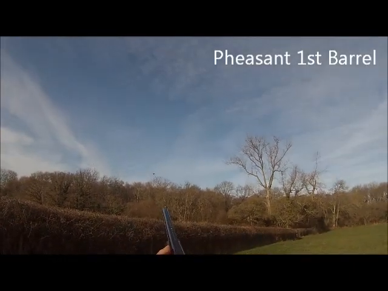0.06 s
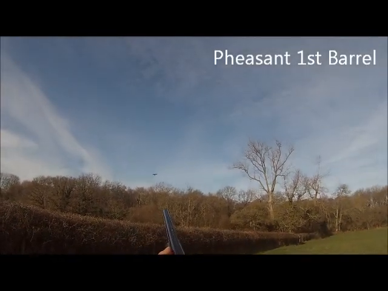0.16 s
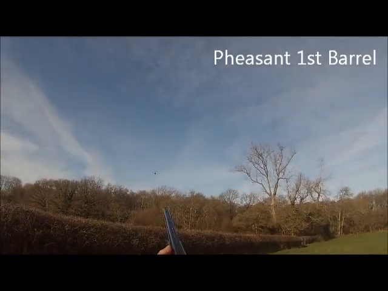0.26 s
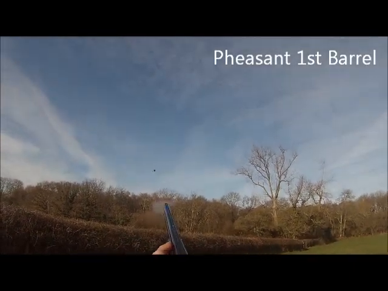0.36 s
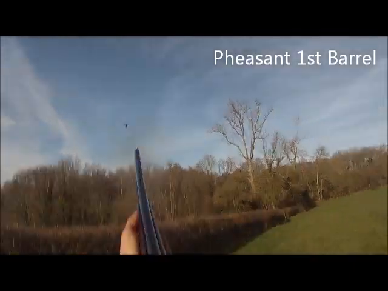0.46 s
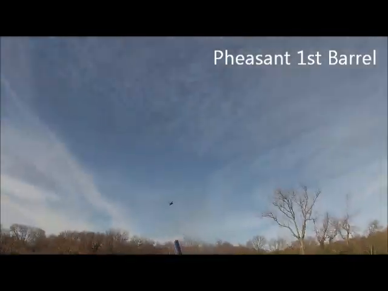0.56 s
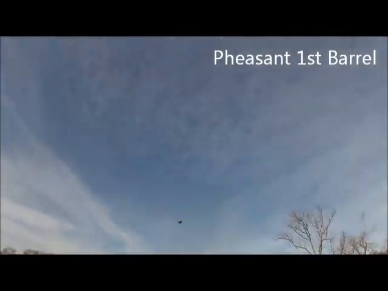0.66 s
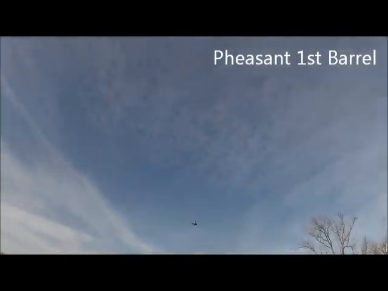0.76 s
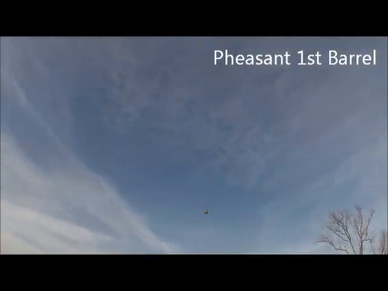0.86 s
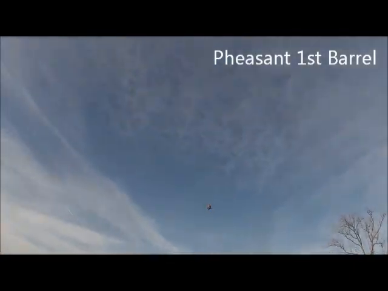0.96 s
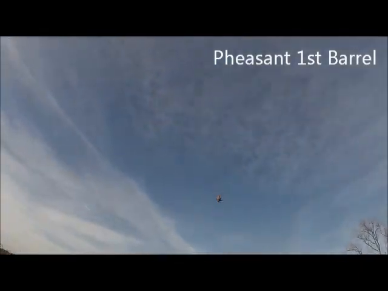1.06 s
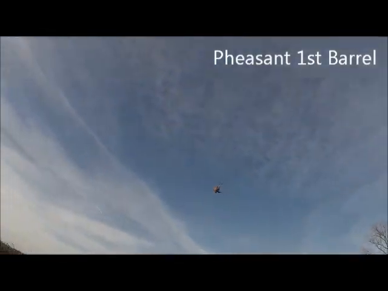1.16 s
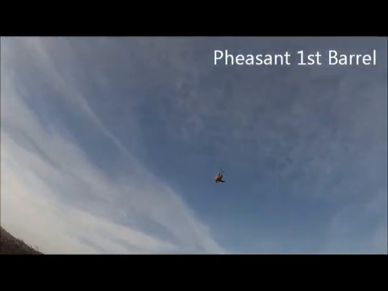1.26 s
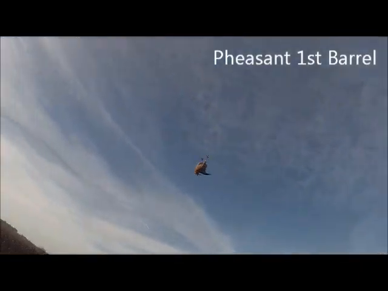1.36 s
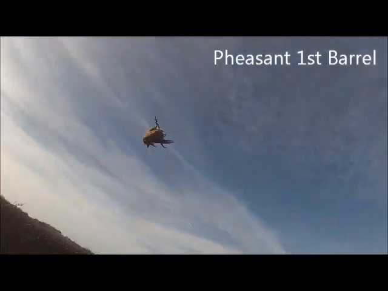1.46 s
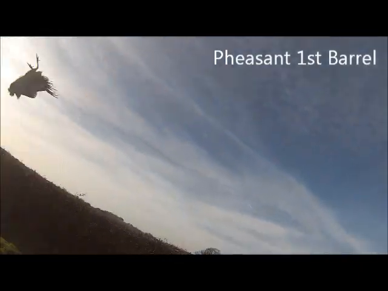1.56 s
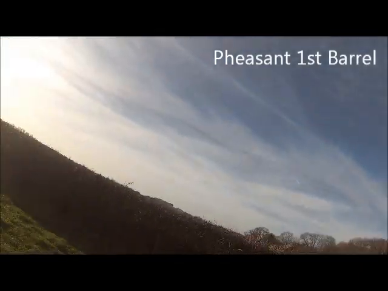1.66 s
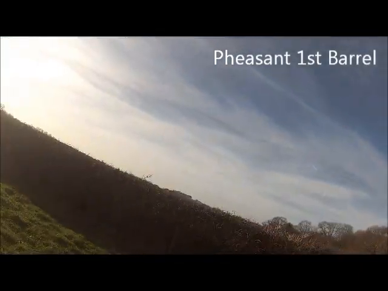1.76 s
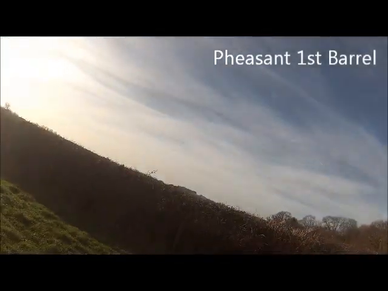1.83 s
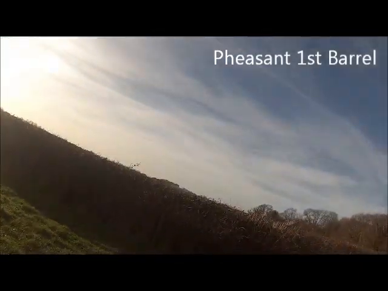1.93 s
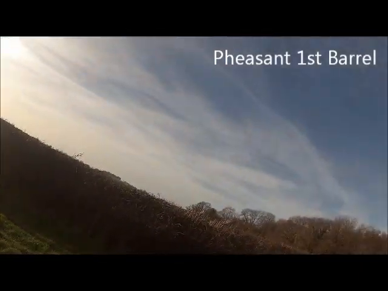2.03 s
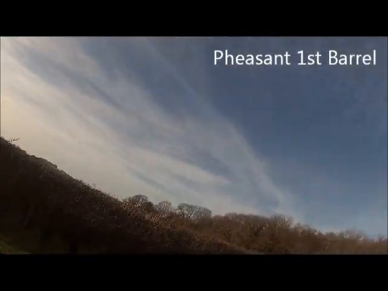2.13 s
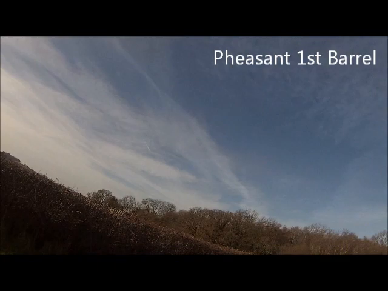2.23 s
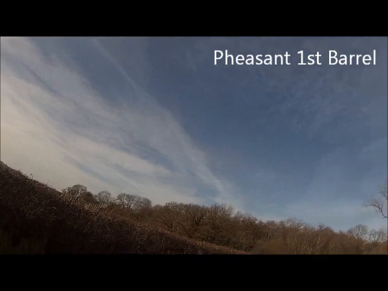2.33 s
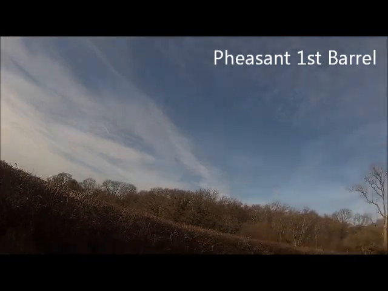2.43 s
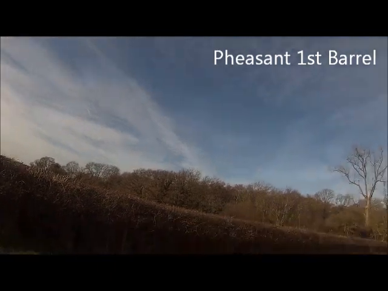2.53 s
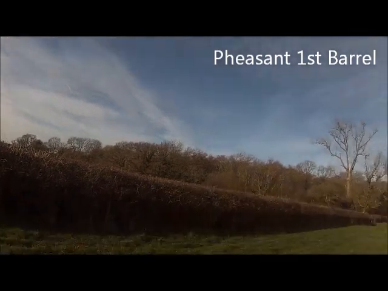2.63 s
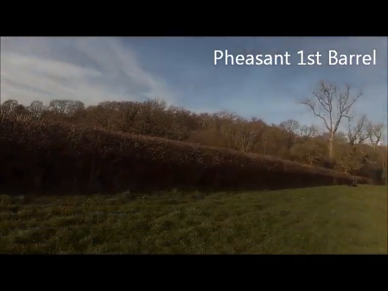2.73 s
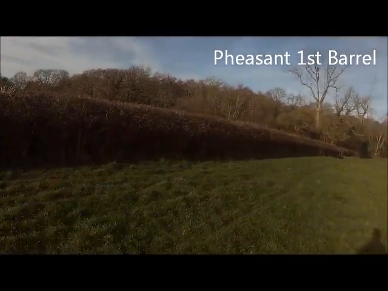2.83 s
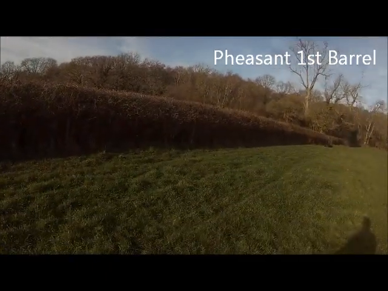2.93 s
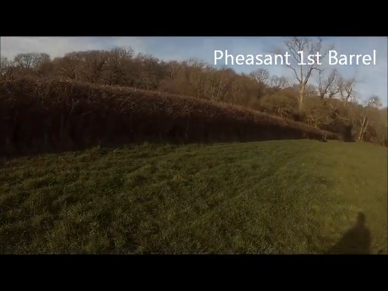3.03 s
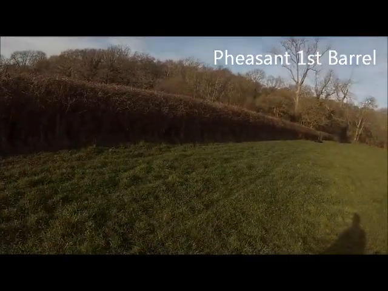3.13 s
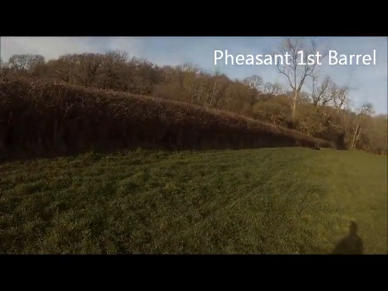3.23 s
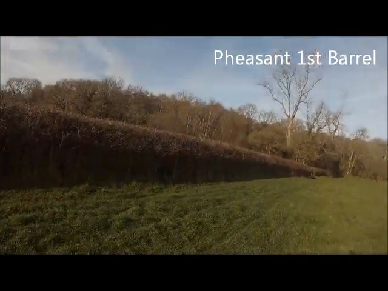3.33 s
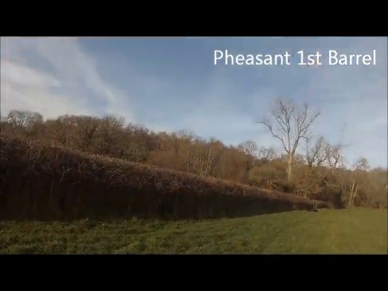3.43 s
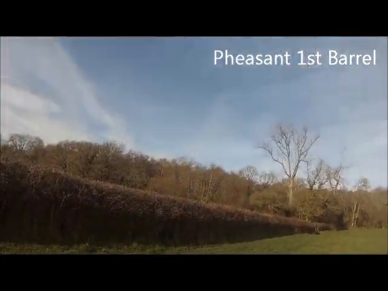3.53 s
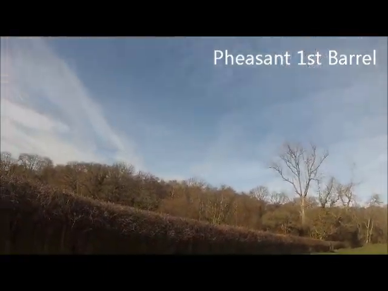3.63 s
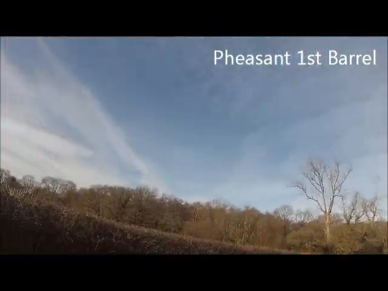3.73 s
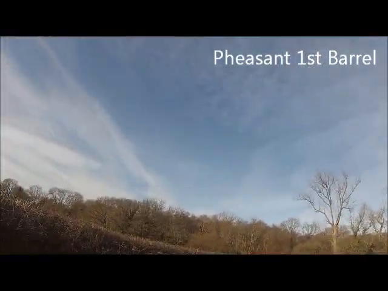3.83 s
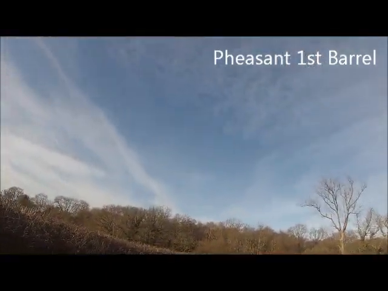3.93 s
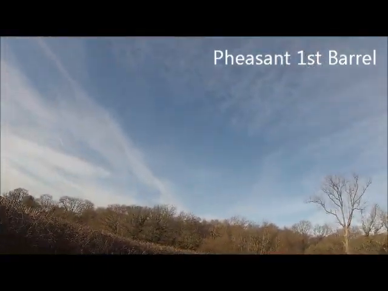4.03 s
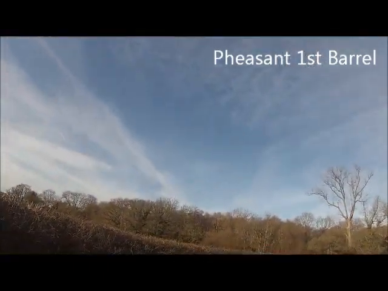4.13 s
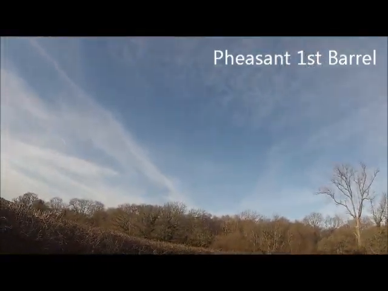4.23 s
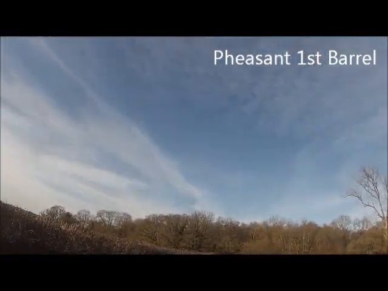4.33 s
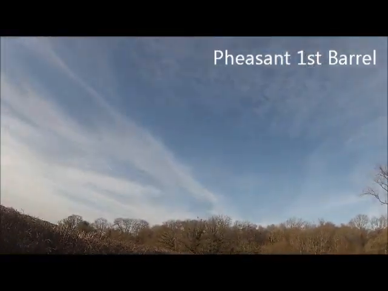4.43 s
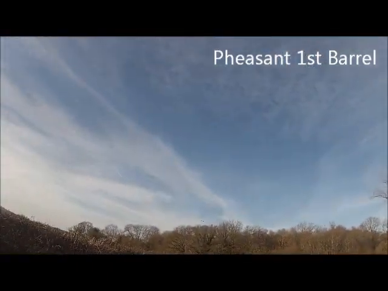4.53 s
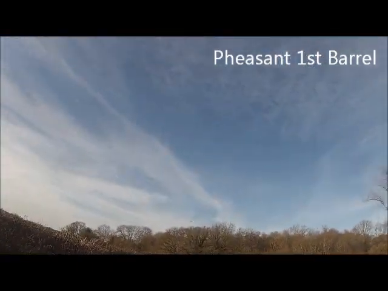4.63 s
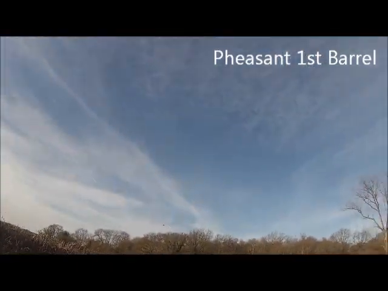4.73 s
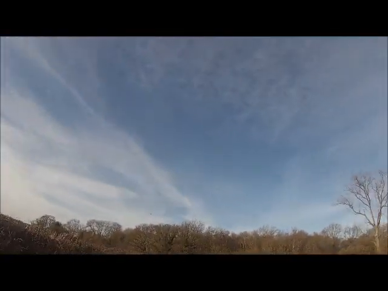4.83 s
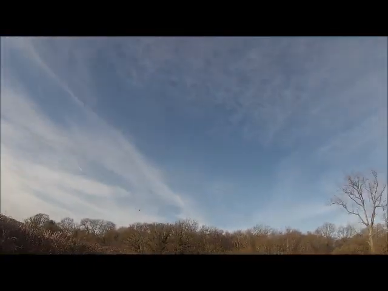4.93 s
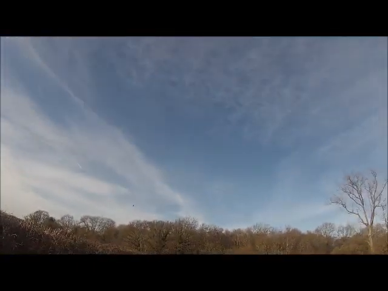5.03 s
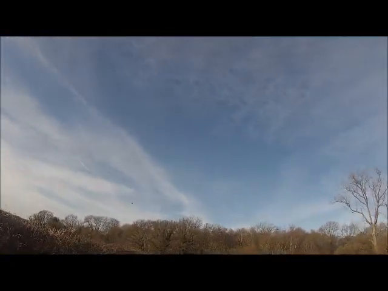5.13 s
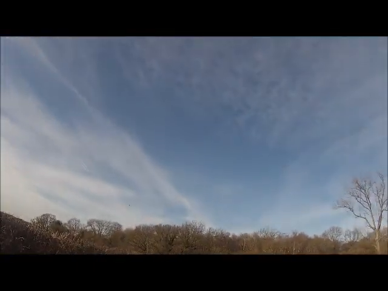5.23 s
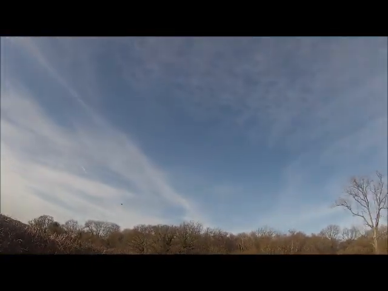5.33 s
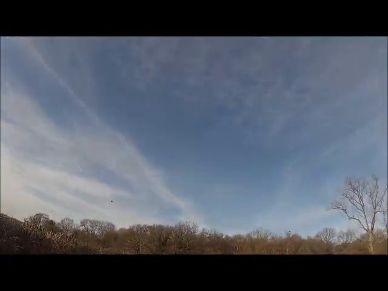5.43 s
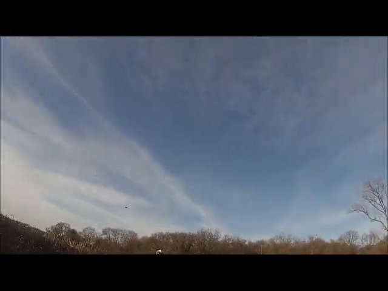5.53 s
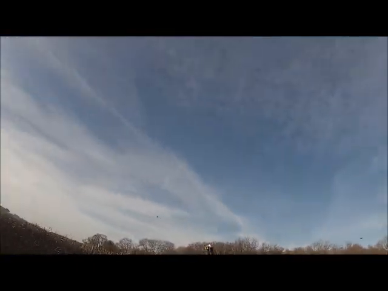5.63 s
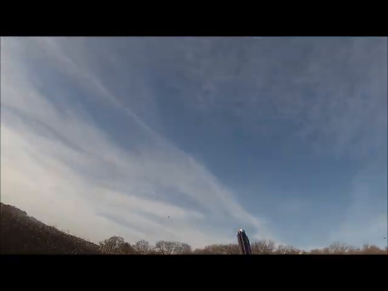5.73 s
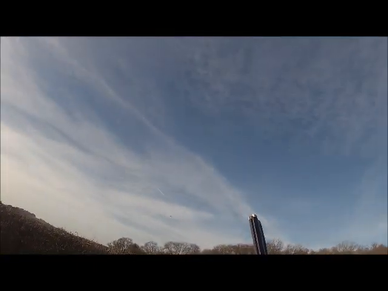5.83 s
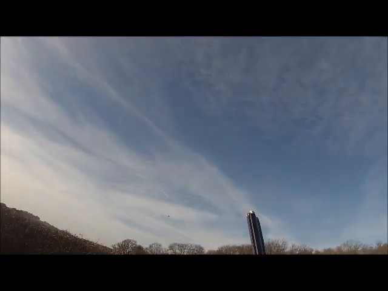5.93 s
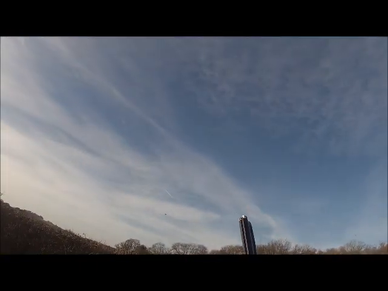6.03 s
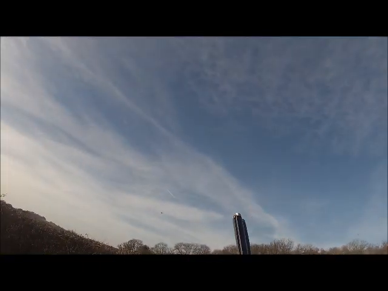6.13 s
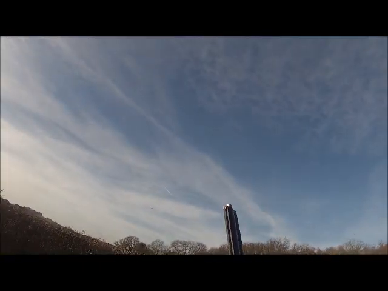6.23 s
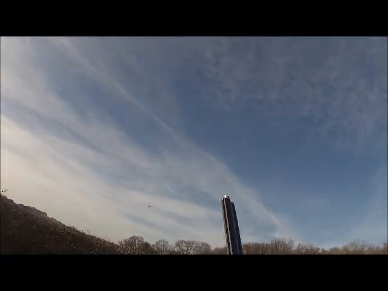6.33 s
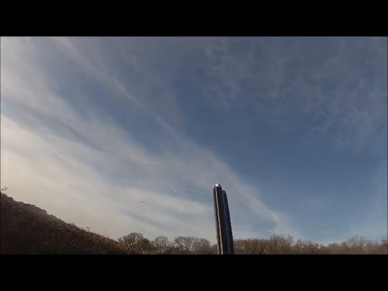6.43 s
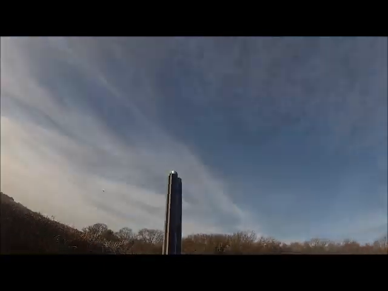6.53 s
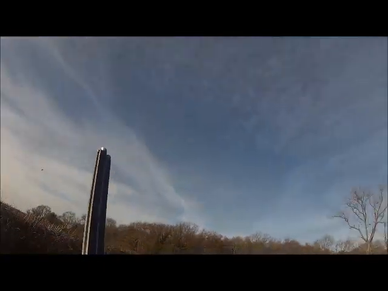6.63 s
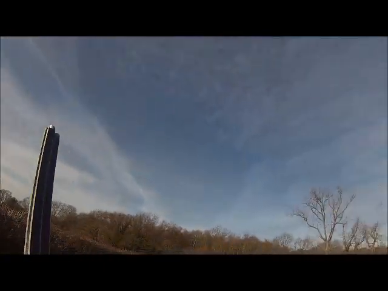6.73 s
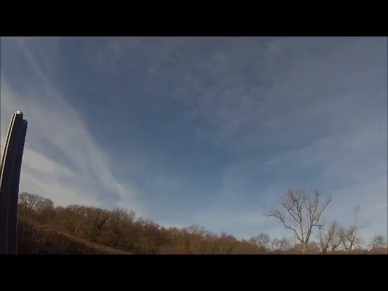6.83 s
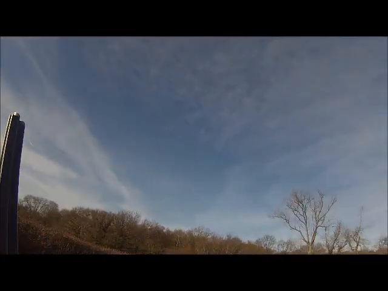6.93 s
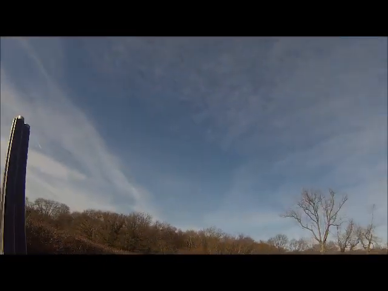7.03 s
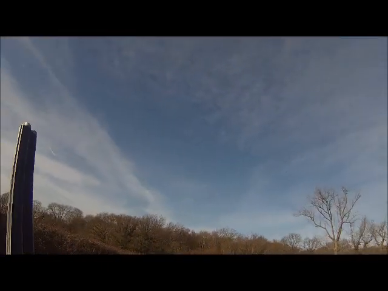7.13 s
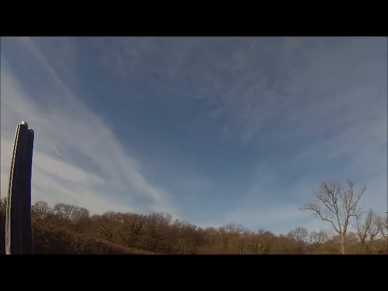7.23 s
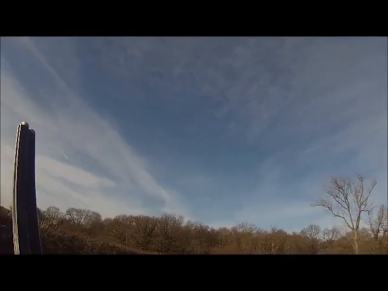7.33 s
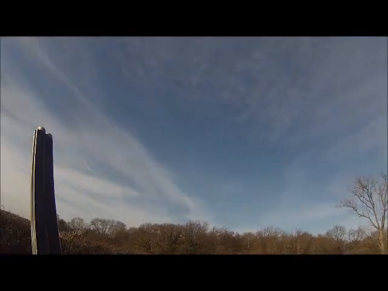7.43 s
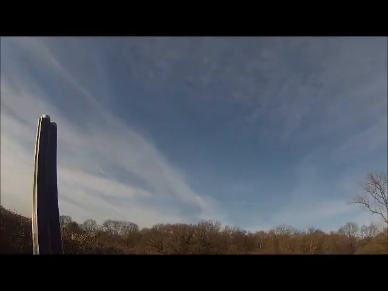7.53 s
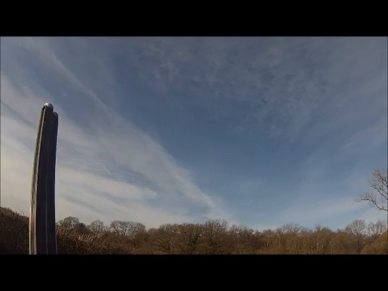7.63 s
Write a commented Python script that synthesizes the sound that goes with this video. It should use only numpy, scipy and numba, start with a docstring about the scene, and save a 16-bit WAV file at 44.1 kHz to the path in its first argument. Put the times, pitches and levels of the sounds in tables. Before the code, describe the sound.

Quiet field hiss with faint regular electrical ticking, then a huge close shotgun blast, boxy and clipped, followed by a short slap and fading roll from hedge and trees. A hard metallic clack comes about a second later, then sparse light steel clicks. The gun closes with a ringing double clack and quick rattle. Two distant, muffled pops follow almost a second apart, with grainy echoes, before hiss remains. Mono, cased camera microphone.

```python
"""A shotgun goes off beside a small camera in a sealed case, out in a field; two more shots come from a neighbour.
Blasts are noise shaped by pressure envelopes and coloured by the case; hedge and woods throw them back.
The gun's action clacks as scraped noise ringing steel modes; the mount thuds as decaying low sines.
Wind rumbles on the case as filtered noise over a steady hiss, and the camera's radio ticks into its microphone
line by filtered supply dips. Its gain control ducks loud passages, then the sound is softly clipped."""
import sys
import numpy as np
from scipy import signal
from scipy.fft import rfft, irfft
from scipy.io import wavfile
from scipy.ndimage import uniform_filter1d
from numba import njit

SR = 44100
rng = np.random.default_rng(int(sys.argv[2]) if len(sys.argv) > 2 else 0)


def generate_wav(signal):
    """Clip the signal to [-1, 1] and save it as 16-bit WAV at the path in sys.argv[1]."""
    frames = np.transpose(np.atleast_2d(signal))
    scaled = np.clip(frames, -1, 1) * 32767
    pcm = np.round(scaled).astype(np.int16)
    wavfile.write(sys.argv[1], SR, pcm)


N = 338232

# microphone and field hiss spectrum: f/Hz, relative level/dB
HISS_SPECTRUM = [(59, -31.5), (100, -0.5), (319, -6), (541, -8.5), (917, -11.5), (1160, -14), (1490, -11.5),
                 (3050, -17), (12600, -30), (15500, -36)]
HISS_DB = -61.5  # rms
# wind on the case: t/s, rumble level/dB
WIND_LEVELS = [(0, -46), (.2, -45), (.42, -47), (.5, -29), (.6, -23), (.7, -38.5), (.98, -49.5),
               (1.18, -41), (1.42, -50), (1.65, -50.5), (2.5, -52), (3.4, -57), (3.8, -53), (3.92, -41.5),
               (4.65, -48), (4.85, -52), (5.28, -50.5), (5.801, -55), (6.35, -53), (6.8, -58), (7., -53.5),
               (7.67, -61)]
FLUTTER_DB, GUST_DB, GUST_S = -17, 2.5, .08  # flutter is relative to the rumble
BEACON_FIRST_S, BEACON_PERIOD_S = .04885, .1024
BEACON_MS, BEACON_DB = 1.72, -40.5  # supply dip, before filtering

# cavities of the camera case, one table per range: f/Hz, width/Hz, level/dB
CASE_MID_MODES = [(1257, 330, -9.5), (1550, 380, -2), (1901, 310, 1.5), (2407, 350, -4.5), (2864, 350, -7),
                  (3226, 410, -9.5)]
CASE_TREBLE_MODES = [(3730, 340, -8), (4030, 320, -5.5), (4292, 410, -1), (4940, 800, -5)]
CASE_BASS_MODES = [(301, 230, -6), (546.3, 280, -1), (874, 410, -1), (1092, 250, 0.5)]
CASE_SIZZLE_MODES = [(7482, 1900, 2.5), (9363, 990, 0), (10360, 870, -4.5), (11900, 580, -9),
                     (12400, 710, -9), (14000, 1400, -8)]
CASE_HIGH_MODES = [(5800, 350, 0.5), (6348, 540, -2.5), (7040, 500, -8)]
# every list of five range levels follows this order
RANGES = CASE_MID_MODES, CASE_TREBLE_MODES, CASE_BASS_MODES, CASE_SIZZLE_MODES, CASE_HIGH_MODES
HIGH_DB, HIGH_LOSS = -3.5, 1.6  # air dulls the high range this many times as much as the treble

# muzzle blasts; treble, bass and sizzle are relative to the mid range:
# t/s, mid level/dB, blast length/ms, share of it that the upper ranges last, treble/dB, bass/dB, sizzle/dB,
# pressure push/dB, afterblast/dB relative to the blast, ground scatter/dB, scatter t60/s
BLASTS = [(0.469, 9.5, 3.93, 0.84, 2, -16, -16.5, 5, -24.5, -43, 0.27),
          (5.043, -20.5, 2.72, 0.77, -2.5, -14, -16.5, -29.5, -11.5, -27.5, 0.55),
          (5.878, -24, 3.14, 0.72, -2.5, -15, -16, -32.5, -8, -25.5, 0.48)]
# slaps from hedge and tree line: t of peak/s, mid level/dB, rise/ms, relative treble/dB, relative bass/dB
ECHO_SLAPS = [(0.526, -36, 25, 1.5, -8), (.619, -44, 24, -27, -6), (.729, -55.5, 9.7, -19, -12.5),
              (.764, -52.5, 10.3, -4.5, -10), (.92, -59, 8.3, -5, -3.5), (.945, -61.5, 11.3, -3, 4),
              (5.196, -55.5, 9.7, 1.5, -14), (5.216, -41.5, 8, -6, -1.5), (5.34, -55.5, 9.5, -9.5, -6),
              (6.036, -55, 4.8, -3, -5.5), (6.054, -48.5, 8.3, -7, -8), (6.565, -64, 6.6, -16.5, -11.5)]
# air takes the top off slaps and rolls, this many times their treble loss
ECHO_SIZZLE_DB, SIZZLE_LOSS = -13.5, 2
SLAP_T60_PER_RISE = 11.9  # a slap dies away over this many rise times
# rolls from the far woods, one per shot: t of arrival/s, mid level/dB, hold/s, fade/(dB/s), relative bass/dB
WOOD_ROLLS = [(0.841, -54.5, 0.24, 19.5, -3), (5.238, -53.5, 0.13, 30, -3), (6.074, -59, 0.17, 31.5, -8)]
ROLL_RISE_S, ROLL_TREBLE_DB, ROLL_DULL_DB_PER_S, ROLL_DULLEST_DB = 0.062, -3, 28, -13

# dull knocks through the mount: t/s, level/dB, f/Hz, t60/s
MOUNT_THUDS = [(.475, -36, 40, 0.16), (.522, -37, 240, 0.11), (.558, -24.5, 192, 0.067),
               (0.578, -8, 31, 0.24), (.58, -26, 62, 0.15), (.655, -44.5, 221, 0.22),
               (1.423, -40, 44.7, 0.13), (4.263, -37.5, 98, 0.155)]
# steel parts of the gun knocking: t/s, peak level/dB, contact/ms, ring over scrape/dB, best rung f/Hz
STEEL_KNOCKS = [(.59, -26, .92, -8, 7300), (1.172, -53, 1.1, -12, 7300), (1.289, -53, 1.5, -10, 7300),
                (1.3449, -43, 3, -8, 10500), (1.357, -54, 2.1, -3, 5800), (1.3915, -43, 2.3, -6, 5800),
                (1.4152, -19, 3, -15, 7300), (1.4176, -22, 6.4, 9, 2900), (1.424, -40.5, 22, -22, 5800),
                (1.545, -47, 3, -5, 3200), (1.862, -48.5, 6, -7, 3800), (1.873, -42.5, 14, -3, 3200),
                (1.895, -49.5, 6, -7, 3820), (2.065, -47.5, 2.1, -12, 3800), (2.1102, -45, 1.1, -12, 7300),
                (2.315, -48, 4.06, -10, 5800), (2.831, -42, 4.8, 0, 800), (3.685, -43, 3.9, 4, 2000),
                (3.706, -46.5, 2.5, -5, 3200), (3.844, -48, 5.5, -12, 3800),
                (4.19, -48.5, 1.96, -6.5, 5800), (4.228, -41.5, 11.7, 6, 2700),
                (4.2366, -26.5, 2.4, -12, 2700), (4.239, -24, 4.2, 6, 1750), (4.702, -47, 3.4, -13, 7300),
                (4.94, -50, 1.5, -1.5, 7300), (5.0031, -51, 1.5, -1.5, 7300), (5.156, -48, 2.1, -13, 5800)]
# ringing modes of the gun's steel: f/Hz, relative level/dB, t60/s
STEEL_MODES = [(732, -11, 0.025), (1100, -13, .015), (1630, -20, 0.076), (1687, 2.5, 0.017),
               (2220, -17, 0.019), (2737, 8.5, 0.03), (3150, -9, 0.036), (3815, 3.5, 0.018),
               (6120, -11, 0.013), (7300, -34, 0.0054), (10500, -17, 0.0076)]
TILT_DB, TILT_PER_OCTAVE_DB = 1, 3.5  # knock tilt in dB per octave at a best mode of 3 kHz, and its growth
# the action chatters after it shuts
CHATTER_FROM_S, CHATTER_GAP_S, CHATTER_DB, CHATTER_FADE_DB = 4.25, .0085, -36.5, 1.4
CHATTER_MS, CHATTER_RING_DB, CHATTER_HZ, CHATTER_SAG = 4, 4.5, 2350, 0.89
CEILING, TOP_HZ = .88, 15300


def undb(db):
    """Turn decibels into an amplitude factor."""
    return 10 ** (np.asarray(db) / 20)


def unit(x):
    """Scale to an rms of 1."""
    return x / np.sqrt(np.mean(x ** 2))


def hiss():
    """Microphone noise and the quiet of the fields: noise with a drawn spectrum."""
    hz, db = np.transpose(HISS_SPECTRUM)
    bin_hz = np.arange(N // 2 + 1) * SR / N
    gain = undb(np.interp(np.log(bin_hz + 1), np.log(hz), db))
    noise = irfft(rfft(rng.standard_normal(N)) * gain, N)
    return undb(HISS_DB) * unit(noise)


def lumps(depth_db, seconds):
    """Random gain that changes over about so many seconds."""
    drift = uniform_filter1d(rng.standard_normal(N), int(seconds * SR))
    return undb(depth_db * unit(drift))


def buffeting(edges_hz):
    """A band of wind noise, swelling and easing at random."""
    band_pass = signal.butter(3, edges_hz, "band", fs=SR, output="sos")
    noise = unit(signal.sosfilt(band_pass, rng.standard_normal(N)))
    return lumps(GUST_DB, GUST_S) * noise


def wind():
    """Gusts press on the case: a deep rumble and a higher flutter, each buffeting in its own time."""
    db = np.interp(np.arange(N) / SR, *np.transpose(WIND_LEVELS))
    rumble, flutter = buffeting((18, 42)), buffeting((50, 84))
    return undb(db) * (rumble + undb(FLUTTER_DB) * flutter)


def beacon():
    """Each radio packet briefly pulls the supply down; the coupling capacitor makes that a double tick."""
    phase_s = (np.arange(N) / SR - BEACON_FIRST_S) % BEACON_PERIOD_S
    sag = -undb(BEACON_DB) * (phase_s * 1000 < BEACON_MS)
    ticks = signal.lfilter(*signal.butter(1, 110, "high", fs=SR), sag)
    return signal.lfilter(*signal.butter(1, 3000, fs=SR), ticks)


def band(x, hz, width):
    """Two-pole resonance, gain 1 at the centre."""
    return signal.lfilter(*signal.iirpeak(hz, hz / width, fs=SR), x)


def case(x, modes):
    """Cavities colour the sound, neighbours ringing in opposite sense."""
    out = 0
    for k, (hz, width, db) in enumerate(modes):
        ringing = band(band(x, hz, 1.1 * width), hz, 1.1 * width)
        out = out + (-1) ** k * undb(db) * ringing
    return out


def airborne(envs):
    """Noise under one pressure envelope per range, heard through the case."""
    out = 0
    for env, modes in zip(envs, RANGES):
        noise = rng.standard_normal(N)
        loudness = np.std(case(noise[:SR], modes))
        out = out + case(noise * env, modes) / loudness
    return out


def add(envs, shape, db, treble_db, bass_db, sizzle_db):
    """Lay one sound's envelope on the ranges of the case, in place."""
    high_db = HIGH_DB + HIGH_LOSS * treble_db
    levels_db = [db, db + treble_db, db + bass_db, db + sizzle_db, db + high_db]
    for env, level_db in zip(envs, levels_db):
        env += shape * undb(level_db)


def shots():
    """Turbulent blasts, scatter off the ground, slaps and long rolls, plus the push on the case."""
    t = np.arange(N) / SR
    direct, echoes = np.zeros((2, len(RANGES), N))
    push = blasts(t, direct, echoes)
    slaps(t, echoes)
    rolls(t, echoes)
    # single trunks and bushes answer one by one: echoes are grainy and lumpy
    echoes = echoes * lumps(0.92, 0.0023) * lumps(2.2, 0.0067)
    flex = signal.lfilter(*signal.butter(1, (14, 600), "band", fs=SR), push)
    return airborne(direct + echoes) + flex


def blasts(t, direct, echoes):
    """A few ms of turbulence and fading ground scatter; returns the overpressure that flexes the case once."""
    push = np.zeros(N)
    for s, db, ms, share, treble_db, bass_db, sizzle_db, push_db, after_db, scatter_db, t60 in BLASTS:
        age, begun = np.maximum(t - s, 0), t >= s
        range_ms = ms * np.array([[1], [share], [1], [share], [share]])
        front = np.exp(-(age * 1000 / range_ms) ** 4)
        afterblast = undb(after_db - 60 * age / 0.04)
        None
        for k, range_front in enumerate(front):
            shapes = np.zeros((len(RANGES), N))
            add(shapes, begun * (range_front + afterblast), db, treble_db, bass_db, sizzle_db)
            direct[k] += shapes[k]
        add(echoes, begun * undb(scatter_db - 60 * age / t60), db, treble_db, bass_db, sizzle_db)
        push -= undb(push_db) * begun * np.exp(-((age * 1000 / ms - .55) / 0.38) ** 2)
    return push


def slaps(t, echoes):
    """Hedge and tree line throw a shot back: a rounded rise, then an exponential decay."""
    for s, db, rise_ms, treble_db, bass_db in ECHO_SLAPS:
        rise = np.exp(-((t - s) * 1000 / rise_ms) ** 2 / 2)
        decay = undb(-60 * np.abs(t - s) * 1000 / (SLAP_T60_PER_RISE * rise_ms))
        sizzle_db = SIZZLE_LOSS * treble_db + ECHO_SIZZLE_DB
        add(echoes, np.where(t < s, rise, decay), db, treble_db, bass_db, sizzle_db)


def thuds():
    """Low swings of the camera on its mount, each mostly built up within half a swing."""
    out = np.zeros(N)
    for s, db, hz, t60 in MOUNT_THUDS:
        age = np.maximum(np.arange(N) / SR - s, 0)
        build_up = 1 - np.exp(-4. * hz * age)
        out -= undb(db - 60 * age / t60) * build_up * np.sin(2 * np.pi * hz * age)
    return out


def clacks():
    """Each knock scrapes for a few ms, coloured by the case, and rings the same steel modes."""
    out, t = np.zeros(N), np.arange(8192) / SR
    half = len(t) // 2
    hz, mode_db, t60 = np.transpose(STEEL_MODES)[:, :, None]
    rings = np.sin(2 * np.pi * hz * t) * undb(mode_db - 60 * t / t60)
    click = 1. * (t == 0)
    cavities = 0
    for modes, range_db in zip(RANGES, (8.0, -6.0, -11, -6, -2.5)):
        cavities = cavities + unit(case(click, modes)) * undb(range_db)
    bin_hz = np.arange(half + 1) * SR / len(t)
    octave = np.log2(np.clip(bin_hz, 600, 11000) / 3000)
    for s, db, ms, ring_db, best_hz in STEEL_KNOCKS + chatter(count=8):
        scrape = rng.standard_normal(len(t)) * np.exp(-(t * 1000 / ms) ** 2)
        # modes far from the best rung one are weaker, and each varies by chance
        mode_gain = undb(3.1 * rng.standard_normal((len(hz), 1)) - 20.0 * np.abs(np.log2(hz / best_hz)))
        steel = np.sum(rings * mode_gain, axis=0)
        body = unit(cavities) + undb(ring_db) * unit(steel)
        # knocks that ring higher modes are brighter
        tilt_db = TILT_DB + TILT_PER_OCTAVE_DB * np.log2(best_hz / 3000)
        knock = irfft(rfft(scrape) * rfft(body) * undb(tilt_db * octave))
        i = int(s * SR)
        out[i:i + half] += undb(db) * knock[:half] / np.abs(knock).max()
    return out


def rolls(t, echoes):
    """The far woods answer in a long roll that swells, holds, fades and loses treble."""
    for s, db, hold_s, fade_db, bass_db in WOOD_ROLLS:
        age = np.maximum(t - s, 0)
        treble_db = np.maximum(ROLL_TREBLE_DB - ROLL_DULL_DB_PER_S * age, ROLL_DULLEST_DB)
        sizzle_db = SIZZLE_LOSS * treble_db + ECHO_SIZZLE_DB
        swell = np.clip(1 + (t - s) / ROLL_RISE_S, 0, 1) ** 2
        level_db = db - fade_db * np.maximum(age - hold_s, 0)
        add(echoes, swell, level_db, treble_db, bass_db, sizzle_db)


def chatter(count):
    """Bounces of the action: uneven gaps, on the whole each weaker and duller."""
    bounces = []
    for k in range(count):
        time_chance, level_chance = rng.standard_normal(2)
        s = CHATTER_FROM_S + CHATTER_GAP_S * (k + .15 * time_chance)
        db = CHATTER_DB - CHATTER_FADE_DB * k + 1.5 * level_chance
        bounces.append((s, db, CHATTER_MS, CHATTER_RING_DB, CHATTER_HZ * CHATTER_SAG ** k))
    return bounces


def scene():
    """Mix all layers to one channel."""
    return (hiss() + wind() + beacon() + shots() + thuds() + clacks())[None]


@njit
def duck(over_db, hold, release):
    """Gain cut follows an overload at once, holds, then lets go by a fixed dB step per sample."""
    cut, c, wait = np.empty(len(over_db)), 0., 0.
    for i in range(len(over_db)):
        if over_db[i] >= c:
            c, wait = over_db[i], hold
        elif wait > 0:
            wait -= 1
        else:
            c = max(c - release, 0.)
        cut[i] = c
    return cut


def record(dry, threshold_db=-15.5, most_db=10.5, hold_s=0.19, release_db=14.5, ahead_s=0.016):
    """Gain control that looks a little ahead (release in dB/s), soft clipping, and the cut at the top."""
    loud_db = 10 * np.log10(uniform_filter1d(dry[0] ** 2, SR // 250) + 1e-12)
    cut = duck(np.clip(loud_db - threshold_db, 0, most_db), hold_s * SR, release_db / SR)
    cut = uniform_filter1d(np.roll(cut, -int(ahead_s * SR)), SR // 200)
    wet = CEILING * np.tanh(dry * undb(-cut) / CEILING)
    return signal.sosfilt(signal.ellip(8, .2, 70, TOP_HZ, fs=SR, output="sos"), wet)


dry = scene()
out = record(dry)
generate_wav(out)
```